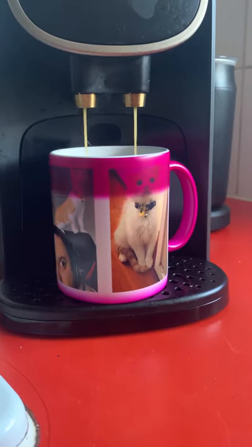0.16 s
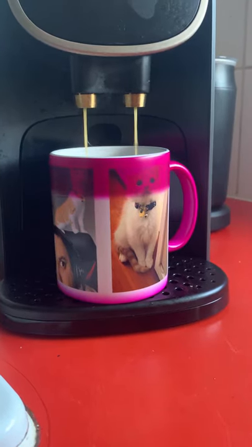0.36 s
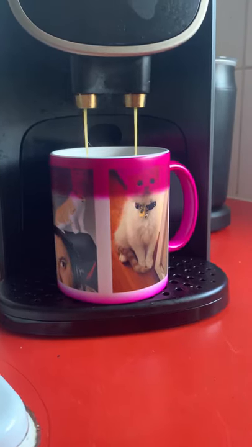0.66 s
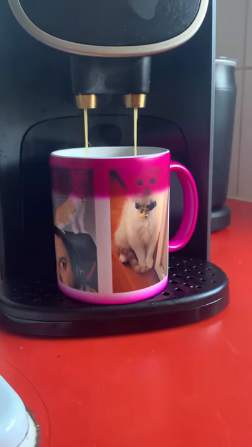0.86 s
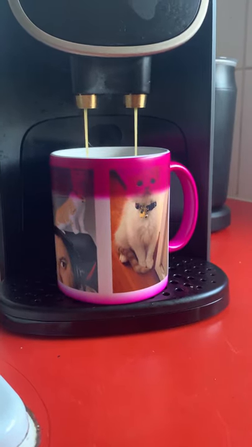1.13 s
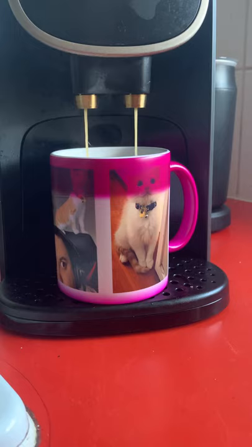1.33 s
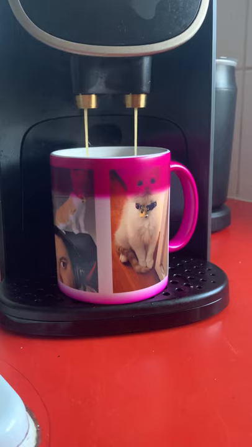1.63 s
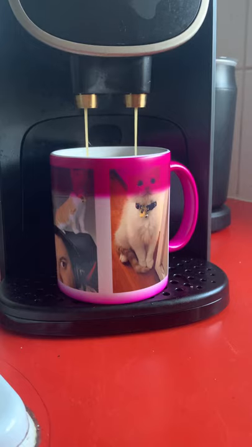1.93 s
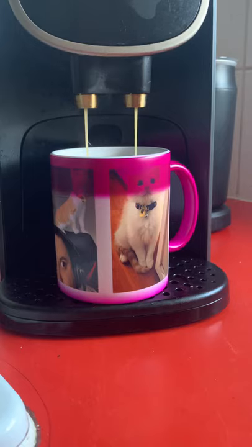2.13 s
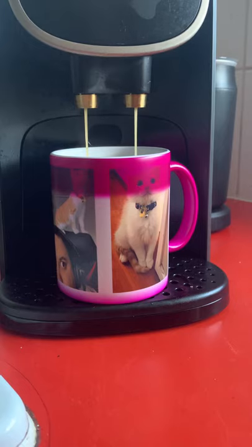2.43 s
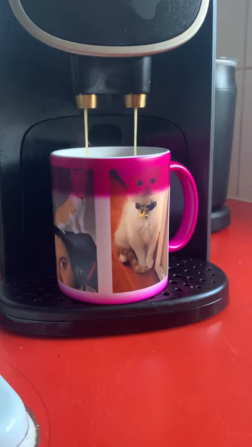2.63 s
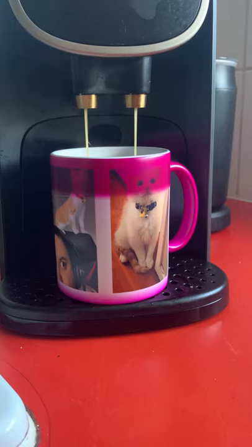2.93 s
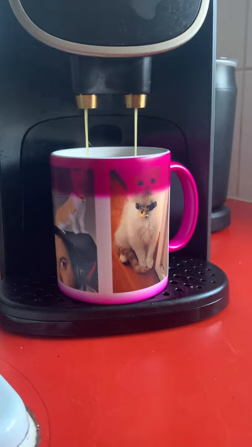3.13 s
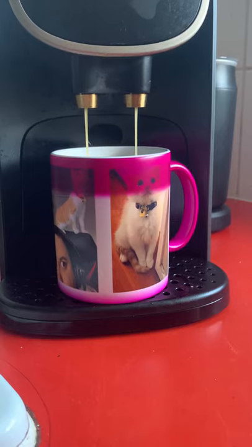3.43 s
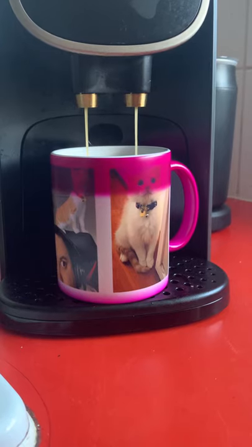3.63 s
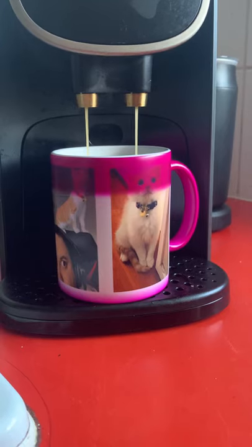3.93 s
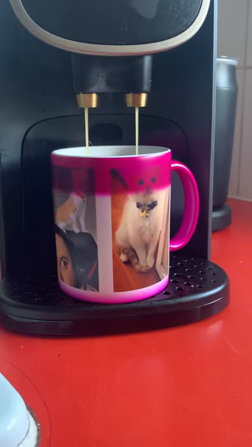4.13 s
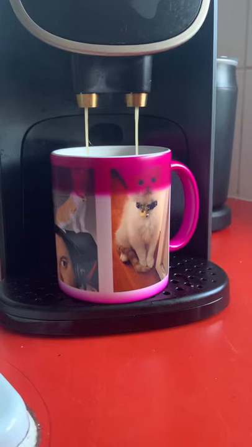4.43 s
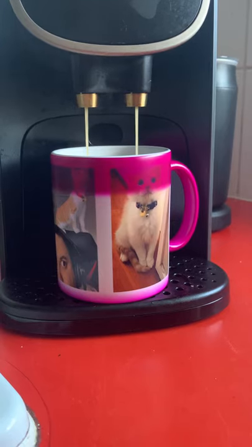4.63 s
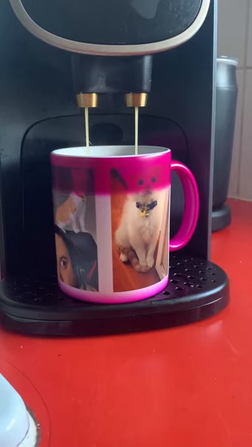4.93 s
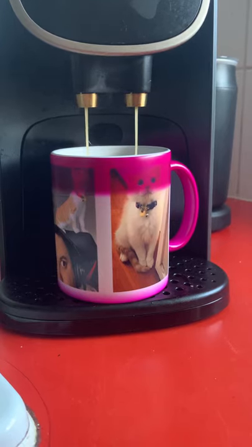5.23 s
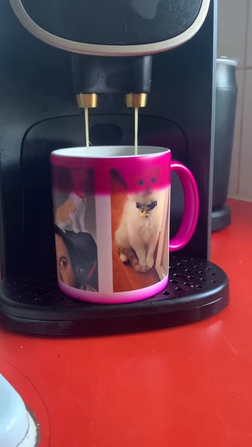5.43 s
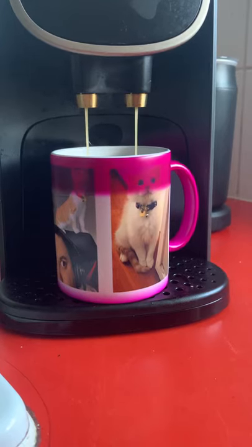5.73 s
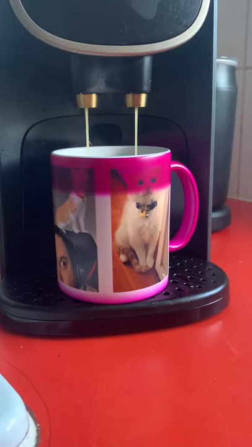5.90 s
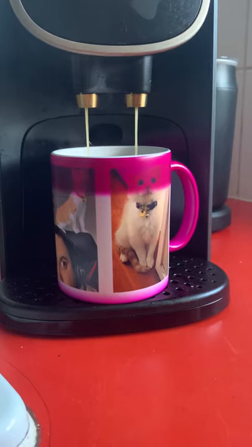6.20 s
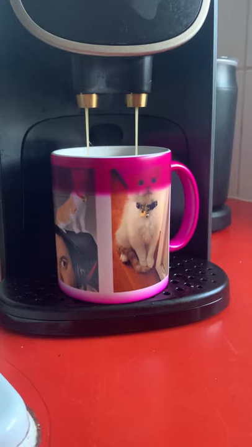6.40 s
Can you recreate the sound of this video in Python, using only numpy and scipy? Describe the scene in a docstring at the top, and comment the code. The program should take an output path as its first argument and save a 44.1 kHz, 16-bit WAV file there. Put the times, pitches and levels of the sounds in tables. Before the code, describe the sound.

The steady buzzing hum of a coffee maker, with light rattles and a pulsing hiss, over a soft pour into a mug.

```python
"""A buzzing hum, with rattles and hiss: a coffee machine pours two thin streams into a mug in a kitchen.
Its vibration pump strikes once per mains cycle. This periodic force drives the casing at harmonics of
the stroke rate and rings loose parts at their own modes; each stroke ends in a spurt through the valve.
After four seconds the pump rocks on its mounts, repeating every third stroke and adding subharmonics.
Faint bubbles, a soft trickle, a low drone and the noise of the room lie underneath."""
import sys
import numpy as np
from scipy import signal
from scipy.fft import rfft, irfft, next_fast_len
from scipy.io import wavfile
from scipy.ndimage import map_coordinates

SR = 44100
rng = np.random.default_rng(int(sys.argv[2]) if len(sys.argv) > 2 else 0)


def to_wav(s):
    """Save 16-bit WAV."""
    ch = np.atleast_2d(s).T  # columns
    pcm = np.round(np.clip(ch, -1, 1) * 32767)  # PCM
    wavfile.write(sys.argv[1], SR, pcm.astype(np.int16))


N = 289296
TIME = np.arange(N) / SR
STROKE_HZ = 49.961

# Modes of the plastic housing. Each row: frequency in Hz, width in Hz, relative level in dB.
HOUSING_MODES = [(1306, 150, -13), (1590, 120, -15), (2243, 63, -12), (2600, 180, -3), (2760, 130, -6.5),
                 (2977, 76, -6), (3503, 155, -2.5), (3586, 61, -6), (4870, 84, -3), (5537, 120, -1),
                 (6054, 110, -2), (6340, 120, -3.5), (6694, 180, -4.5), (7670, 140, -8), (7980, 140, -10.5),
                 (8640, 940, -12)]
# Spectrum of the valve's hiss. Each row: frequency in Hz, relative density in dB.
VALVE_SPECTRUM = [(1500, -37), (4000, -5.5), (6500, -0.5), (8250, -6.5), (8700, -4.5), (10900, 0.5),
                  (12400, 2), (13200, -2.5), (14100, -5), (15000, -5), (15900, -9.5)]
# How freely the housing and tray shake. Each row: time in seconds, looseness from 0 to 1.
PART_LOOSENESS = [(0, 0.4), (.75, .7), (1.4, 0.15), (3.9, 0), (5.0, 0), (6.56, 1)]


def amp(db):
    """Amplitude grows tenfold for every 20 dB."""
    return 10 ** (np.asarray(db) / 20)


def unit(x):
    """Normalisation to rms 1."""
    return x / np.sqrt(np.mean(x ** 2) + 1e-20)


def curve(points):
    """Linear interpolation of (seconds, value) points at every sample."""
    return np.interp(TIME, *np.transpose(points))


def ramp(start_s, length_s):
    """A linear rise from 0 to 1, then held."""
    return np.clip((TIME - start_s) / length_s, 0, 1)


def wobble(rate):
    """Slow random modulation: a spline through `rate` Gaussian knots a second."""
    return map_coordinates(rng.standard_normal(256), [TIME * rate], mode="wrap")


def filtered(x, response):
    """Linear filtering: the spectrum of x is multiplied by a complex response of frequency."""
    size = next_fast_len(N + SR // 4)
    return irfft(rfft(x, size) * response(np.fft.rfftfreq(size, 1 / SR)), size)[..., :N]


def coloured(x, spectrum):
    """Spectral shaping by (Hz, dB) points on a logarithmic frequency axis; rms 1."""
    points_hz, db = np.transpose(spectrum)
    return unit(filtered(x, lambda hz: amp(np.interp(np.log(hz + 1), np.log(points_hz), db))))


def ringing(x, modes):
    """Resonance: x passes through a body's steep-sided modes, whose powers add; rms 1."""
    def power(f):
        return sum(amp(db) ** 2 / (1 + (2 * (f - hz) / width) ** 2) ** 2 for hz, width, db in modes)
    return unit(filtered(x, lambda f: np.sqrt(power(f))))


def room_noise():
    """Ambient noise, mostly low in pitch and largely coherent between the two sides."""
    # Each row: frequency in Hz, relative density in dB.
    spectrum = [(20, -11.5), (70, 5.5), (130, -0.5), (300, -0.5), (400, -11), (520, -11), (620, -21.5),
                (850, -12.5), (1050, -20), (1800, -16.5), (3000, -17), (8000, -20.5), (16000, -45)]
    noise = rng.standard_normal(N) + .13 * rng.standard_normal((2, N))
    return amp(-55) * coloured(noise, spectrum)


def drone(pitch_hz=54.54, waver_rad=.88):
    """Random phase modulation makes a low tone waver; a little rumble surrounds it."""
    # Each row: time in seconds, level of the tone in dB.
    levels = [(0, -55), (.6, -52.5), (2.1, -49), (2.25, -60), (2.8, -54.5), (3.1, -65), (5.3, -63),
              (5.7, -53), (6.56, -54)]
    # Each row: frequency in Hz, relative density in dB.
    rumble_spectrum = [(20, -18), (28, 3), (36, -10.5), (52, 7), (64, -1), (80, -0.5), (130, -29.5)]
    tone = np.sin(2 * np.pi * pitch_hz * TIME + waver_rad * wobble(4.94))
    rumble = coloured(rng.standard_normal(N), rumble_spectrum)
    return amp(curve(levels)) * tone + amp(-61.5) * rumble


def reverberation(x, t60_s=.21):
    """Reflections from tiles and counter decay exponentially, differently on each side."""
    t = TIME[:SR // 4]
    tail = rng.standard_normal((2, len(t))) * amp(-60 * t / t60_s)
    return signal.fftconvolve(x[None], tail / np.linalg.norm(tail[0]), axes=1)[:, :N]


def trickle(level_db=-64, flutter_db=2.5):
    """Flow noise: the streams stir the coffee into a fluttering wash, independent on each side."""
    # Each row: frequency in Hz, relative density in dB.
    spectrum = [(250, -24), (500, -4), (800, 0.5), (1000, -0.5), (1350, -0.5), (1700, -5.5), (2200, -22.5)]
    return amp(level_db + flutter_db * wobble(14)) * coloured(rng.standard_normal((2, N)), spectrum)


def bubbles(count=1500, median_hz=2400, log_spread=.442, decay_periods=7):
    """Each bubble that the streams make in the mug is a damped oscillator, rising in pitch as it dies."""
    onset, size = rng.random((2, count, 1))
    hz = np.clip(median_hz * np.exp(log_spread * rng.standard_normal((count, 1))), 1000, 9000)
    samples = np.arange(1024)
    periods = hz * samples / SR
    chirps = np.sin(2 * np.pi * periods * (1 + .004 * periods))
    pings = size ** 2 * np.exp(-periods / decay_periods) * chirps
    index = (onset * N).astype(int) + samples
    return amp(-65) * unit(np.bincount(index.ravel(), pings.ravel(), N)[:N])


def stroke_gains(cycle, scatter_db):
    """Amplitude scatter: a new random gain for each stroke."""
    return amp(scatter_db * rng.standard_normal(512))[(cycle + .5).astype(int)]


def contact_pattern(cycle, scrape_db=-14, whitening=.35):
    """Periodic excitation: the same ticks and short scrapes in every stroke give a line spectrum."""
    # Each row: place in the stroke from 0 to 1, relative level in dB, decay of the scrape in cycles.
    contacts = [(.63, -3.5, 0.038), (.72, -0.5, 0.035), (.84, -2.5, 0.2), (.1, -10, 0.083),
                (.38, -8.5, 0.13)]
    size = int(SR / STROKE_HZ)
    phase = np.arange(size) / size
    envelope = sum(amp(db) * np.exp(-((phase - place) % 1) / decay) for place, db, decay in contacts)
    force = amp(scrape_db) * rng.standard_normal(size) * envelope
    for place, db, _ in contacts:
        tick = place + .008 * rng.standard_normal()
        force[int(tick * size) % size] += amp(db) * rng.choice([-1, 1])
    lines = rfft(force)
    pattern = unit(irfft(lines / np.abs(lines) ** whitening, 8 * size))  # oversampled eightfold
    return np.interp(cycle % 1, np.arange(len(pattern)) / len(pattern), pattern)


def chatter(cycle, rocking, scrape, sway):
    """Intermittent contact of loose parts; rocking shifts it by up to `sway` cycles over three strokes."""
    swayed = cycle + sway * rocking * np.sin(2 * np.pi * (cycle / 3 + rng.random()))
    # The contact points shift slowly and at random: two patterns blend.
    drift = np.clip(.47 * wobble(.52), -1, 1)
    ticks = np.cos(drift) * contact_pattern(swayed) + np.sin(drift) * contact_pattern(swayed)
    friction = scrape * ticks * rng.standard_normal(N)
    return stroke_gains(cycle, scatter_db=.8) * (ticks + friction)


def struck(modes, blows, rocking, jitter, sway):
    """Impulses ring a metal part, mistimed by `jitter` cycles at random and `sway` by rocking; rms 1."""
    stroke = np.arange(int(STROKE_HZ * N / SR))
    shift = sway * rocking[(stroke * SR / STROKE_HZ).astype(int)] * np.sin(2 * np.pi * stroke / 3)
    force = np.zeros(N)
    for place, blow_db in blows:
        late, strength = rng.standard_normal((2, len(stroke)))
        index = ((stroke + place + shift + jitter * late) * SR / STROKE_HZ).astype(int)
        force += np.bincount(index, amp(blow_db + .5 * strength), N)[:N]

    def response(f):
        return sum(amp(db) * (1j * f * width / (hz * hz - f * f + 1j * f * width)) ** 2
                   for hz, width, db in modes)
    return unit(filtered(force, response))


def panel_whine(cycle, rocking, harmonic=30, rest_db=-67, swell_db=13.7, fade_db_per_s=.8):
    """A side panel swells into resonance with one harmonic, buzzes a little and slowly drifts out."""
    # Each row: frequency in Hz, width in Hz, relative level in dB.
    modes = [(1500, 100, 0)]
    start_s, rise_s = .85, .8
    since_peak_s = np.maximum(TIME - start_s - rise_s, 0)
    held = ramp(start_s, rise_s) * (1 - ramp(start_s=4.65, length_s=2))
    level_db = rest_db + held * (swell_db - fade_db_per_s * since_peak_s)
    tone = np.sin(2 * np.pi * harmonic * cycle)
    buzz = amp(-13) * ringing(chatter(cycle, rocking, scrape=.3, sway=.004), modes)
    return amp(level_db + .48 * wobble(5.9)) * (tone + buzz)


def housing_rattle(cycle, rocking):
    """Chatter excites the many modes of the plastic housing, a little more when it is loose."""
    force = chatter(cycle, rocking, scrape=.2, sway=.003)
    return amp(-50.5 + 1.3 * curve(PART_LOOSENESS)) * ringing(force, HOUSING_MODES)


def cover_buzz(cycle, rocking):
    """Chatter excites the closely spaced modes of the thin cover."""
    # Each row: frequency in Hz, width in Hz, relative level in dB.
    modes = [(1746, 100, 0), (1913, 78, 0.5), (2040, 62, -2)]
    # Each row: time in seconds, level in dB.
    levels = [(0, -58.5), (.7, -63.5), (2.3, -63), (4.4, -59.5), (6.56, -60)]
    return amp(curve(levels)) * ringing(chatter(cycle, rocking, scrape=.2, sway=.0058), modes)


def bracket_ring(load, rocking):
    """Impact and friction ring the pump's bracket; it calms under load, and more as the mounts give."""
    # Each row: frequency in Hz, width in Hz, relative level in dB.
    modes = [(3965, 258, 0), (3975, 90, 0), (3493, 170, -5.5)]
    # Each row: place in the stroke from 0 to 1, relative level in dB.
    blows = [(.193, -11), (.595, -5), (.657, 0)]
    ring = struck(modes, blows, rocking, jitter=.0004, sway=.003)
    scrape = amp(-7.5) * ringing(rng.standard_normal(N), modes[:1])
    return amp(-53 - 2.7 * load - 1.2 * rocking) * (ring + scrape)


def pipe_ring(rocking):
    """Impact and friction excite the single strong mode of the boiler pipe."""
    # Each row: frequency in Hz, width in Hz, relative level in dB.
    modes = [(4488, 147, 0)]
    # Each row: place in the stroke from 0 to 1, relative level in dB.
    blows = [(.476, -9), (.61, 0)]
    # Each row: time in seconds, level of the ring in dB.
    levels = [(0, -60), (.65, -54), (1.4, -58.5), (4.35, -60.5), (5, -54), (5.3, -57), (5.55, -52),
              (6.56, -51)]
    ring = struck(modes, blows, rocking, jitter=.0012, sway=.002)
    scrape = amp(-7) * ringing(rng.standard_normal(N), modes)
    return amp(curve(levels)) * (ring + scrape)


def tray_rattle(cycle, rocking):
    """Chatter excites two high modes of the metal drip tray, much more when it is loose."""
    # Each row: frequency in Hz, width in Hz, relative level in dB.
    modes = [(5360, 89, -6.5), (5230, 150, -1)]
    force = chatter(cycle, rocking, scrape=.45, sway=.0012)
    return amp(-56 + 6.7 * curve(PART_LOOSENESS)) * ringing(force, modes)


def pump_body_ring(load, rocking):
    """Two impacts a stroke ring the pump's own body, louder under load and softer while it rocks."""
    # Each row: frequency in Hz, width in Hz, relative level in dB.
    modes = [(2600, 300, 0), (2950, 130, -8)]
    # Each row: place in the stroke from 0 to 1, relative level in dB.
    blows = [(.38, -5), (.7, 0)]
    ring = struck(modes, blows, rocking, jitter=.0004, sway=.003)
    return amp(-58.5 - 3 * (1 - load) - 1.3 * rocking) * ring


def valve_snaps(decay_s=.0024):
    """A hard closing of the valve is a transient: a crack through the housing and a spit of hiss."""
    # Each row: start in seconds, level in dB.
    closings = [(.636, -43), (.894, -39), (3.058, -44), (3.817, -40), (3.858, -39), (3.959, -46),
                (4.079, -39), (4.539, -44), (5.097, -40)]
    envelope = sum(amp(db) * (TIME >= s) * np.exp(-np.abs(TIME - s) / decay_s) for s, db in closings)
    crack, spit = rng.standard_normal((2, N))
    return envelope * (ringing(crack, HOUSING_MODES) + coloured(spit, VALVE_SPECTRUM))


def valve_spurts(cycle, start_cycles=.67, rise_cycles=.097, decay_cycles=.29):
    """Pulsed flow noise: water squeezes through the valve after each stroke, and the hiss dies away."""
    # Each row: time in seconds, level in dB.
    levels = [(0, -51.5), (.35, -48), (.45, -47.5), (.9, -47), (1, -49), (1.4, -48), (1.7, -47), (3.2, -47),
              (3.9, -47), (4.5, -47.5), (4.9, -46.5), (6.56, -46.8)]
    # Spells of pitched hiss. Each row: centre in seconds, Gaussian spread in seconds,
    # frequency in Hz, width in Hz, level at the centre in dB.
    sizzles = [(2.2, 0.89, 9200, 900, -58.5), (4.094, 0.61, 12800, 900, -52), (5.21, 0.64, 10330, 452, -55)]
    age = (cycle - start_cycles) % 1
    swell = (1 - np.exp(-(age / rise_cycles) ** 2)) * np.exp(-age / decay_cycles)
    flow = amp(-19.5) + swell * stroke_gains(cycle, scatter_db=1.7) * amp(.75 * wobble(7.7))
    hiss = amp(curve(levels)) * coloured(flow * rng.standard_normal(N), VALVE_SPECTRUM)
    for centre_s, spread_s, hz, width, db in sizzles:
        fade = np.exp(-.5 * ((TIME - centre_s) / spread_s) ** 2)
        hiss += amp(db) * fade * ringing(flow * rng.standard_normal(N), [(hz, width, 0)])
    return hiss


def mount_knocks(cycle, rocking):
    """Period tripling: every third stroke knocks the mounts, putting lines between those of the hum."""
    # Each row: frequency in Hz, relative gain in dB.
    spectrum = [(60, -24), (85, 1), (115, 9), (140, -16), (170, 2), (220, 6.5), (280, 8.5), (340, -10),
                (420, -9), (520, -7), (600, -12), (700, -3.5), (900, -13), (1000, -15)]
    orders = [k / 3 for k in range(4, 60) if k % 3]
    phases = 1.1 * rng.standard_normal(len(orders))
    knock_cycle = cycle - 1 + .004 * wobble(6)
    knocks = sum(np.cos(2 * np.pi * k * knock_cycle - .3 * k * k + phase)
                 for k, phase in zip(orders, phases))
    return amp(-50.3 + .41 * wobble(7.8)) * rocking * coloured(knocks, spectrum)


def casing_hum(cycle, load, rocking, kick_cycles=.165, rebound_cycles=.8):
    """Forced vibration: the piston's kick drives the casing's low harmonics, its rebound the high ones."""
    # Each row: harmonic number, left level in dB, right level in dB, lead of the left in radians,
    # change without load in dB, change while rocking in dB.
    harmonics = [(2, -42.0, -41.0, -0.2, -2.0, 0.5), (3, -35.5, -30.0, -0.1, -1.5, 0.0),
                 (4, -38.0, -39.0, -0.4, -2.0, 0.5), (5, -47.5, -47.0, -2.1, -1.0, 2.0),
                 (6, -44.5, -44.0, -1.4, 0.5, 1.0), (7, -61.5, -58.0, -1.3, -0.5, -4.0),
                 (8, -53.0, -51.0, -1.4, -1.5, -0.5), (9, -61.5, -56.0, -2.5, -1.5, 0.5),
                 (10, -55.0, -48.5, -2.5, 1.0, -1.5), (11, -67.5, -67.5, -4.5, 3.0, 3.0),
                 (12, -63.5, -64.0, -3.1, -5.5, -4.0), (13, -61.0, -60.0, -2.8, 1.5, 0.5),
                 (14, -67.0, -60.0, -3.4, 3.5, -4.5), (15, -54.0, -47.0, -4.2, -2.5, -1.0),
                 (16, -57.0, -54.0, -7.4, -6.5, -1.5), (17, -57.5, -55.0, -5.7, -7.5, 2.0),
                 (18, -75.5, -65.5, -6.4, 3.5, -0.5), (19, -74.5, -70.5, -4.1, 7.5, 5.5),
                 (20, -61.5, -62.0, -3.8, -1.5, -0.5), (21, -70.5, -69.0, -3.1, 6.0, -4.5),
                 (22, -65.0, -61.0, -3.8, -1.0, 0.0), (23, -73.0, -74.5, -4.1, 0.5, 0.5),
                 (24, -66.0, -66.5, -4.4, -2.0, 0.0), (25, -70.5, -72.0, -2.4, 0.0, 0.5),
                 (26, -67.5, -60.0, -3.8, -1.0, -10.5), (27, -66.5, -63.5, -4.3, 1.5, -8.0),
                 (28, -69.5, -70.0, -4.0, -1.0, 0.0), (29, -65.5, -65.5, -6.2, -3.0, -10.5)]
    sound = np.zeros((2, N))
    for k, left_db, right_db, lead, unloaded_db, rocking_db in harmonics:
        if k < 11:
            lag = 2 * np.pi * k * kick_cycles + .29 * k * k  # dispersion: higher ones arrive later
        else:
            distance = abs(k - 15)  # phases smear away from the rebound's strongest harmonic
            lag = 2 * np.pi * k * rebound_cycles + .09 * distance * min(distance, 4)
        waver_db = .004 * k * k * wobble(2.2)
        gain = amp(unloaded_db * (1 - load) + rocking_db * rocking + waver_db)
        phase = 2 * np.pi * k * cycle - lag + np.array([[.5], [-.5]]) * lead
        sound += amp([[left_db], [right_db]]) * gain * np.cos(phase)
    return sound


def stereo_phase(x):
    """Sound reaches two spaced points with a phase difference that depends on frequency."""
    # Each row: frequency in Hz, lead of the left in radians.
    leads = [(0, 0.5), (170, 0.5), (280, 1), (400, -1), (520, -3.5), (750, -1), (850, -6), (1150, -3.5),
             (1500, -5.9), (2070, -4.5), (2550, -4), (3100, -3.5), (4000, -5), (4500, -4.5), (4900, -3.5),
             (5400, -3), (6600, -1.4), (7300, -0.9), (8400, -1.5), (9400, 0.44), (10200, 1.68), (11300, 2),
             (12200, 3.5), (13400, 3), (14700, 4), (15800, 16.5)]
    sides = np.array([[.5], [-.5]])
    return filtered(x, lambda hz: np.exp(1j * sides * np.interp(hz, *np.transpose(leads))))


def scene():
    """Superposition: one stroke rate drives the machine, with the pour and the room beneath it."""
    cycle = STROKE_HZ * TIME + .002 * wobble(1.2)  # strokes elapsed
    load = ramp(start_s=.25, length_s=.73)
    rocking = ramp(start_s=3.99, length_s=.074)
    rattles = (housing_rattle(cycle, rocking) + cover_buzz(cycle, rocking) + bracket_ring(load, rocking)
               + pipe_ring(rocking) + tray_rattle(cycle, rocking) + pump_body_ring(load, rocking))
    bright = rattles + valve_spurts(cycle) + valve_snaps() + bubbles()
    direct = stereo_phase(mount_knocks(cycle, rocking) + panel_whine(cycle, rocking) + bright)
    air = room_noise()
    hum = casing_hum(cycle, load, rocking)
    return hum + direct + amp(-13.5) * reverberation(bright) + trickle() + drone() + air


def record(dry, cutoff_hz=15800):
    """Band limiting: an ideal low-pass filter removes everything above the cutoff."""
    return filtered(dry, lambda hz: hz < cutoff_hz)


dry = scene()
out = record(dry)
to_wav(out)
```